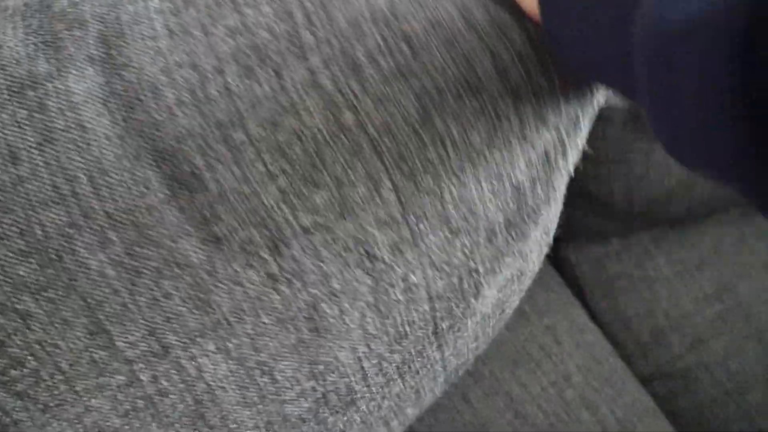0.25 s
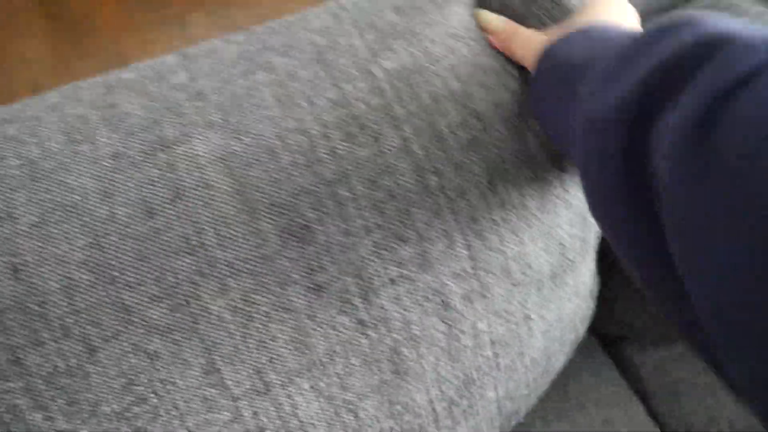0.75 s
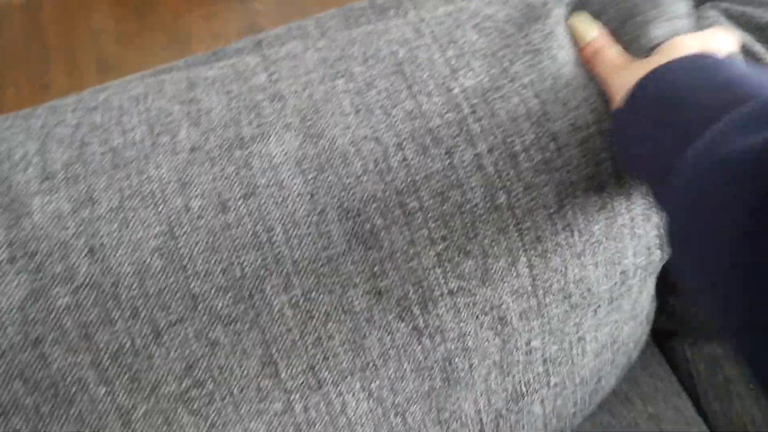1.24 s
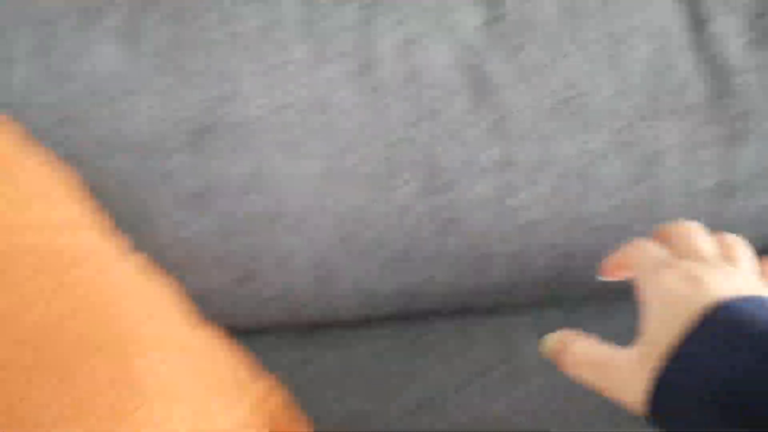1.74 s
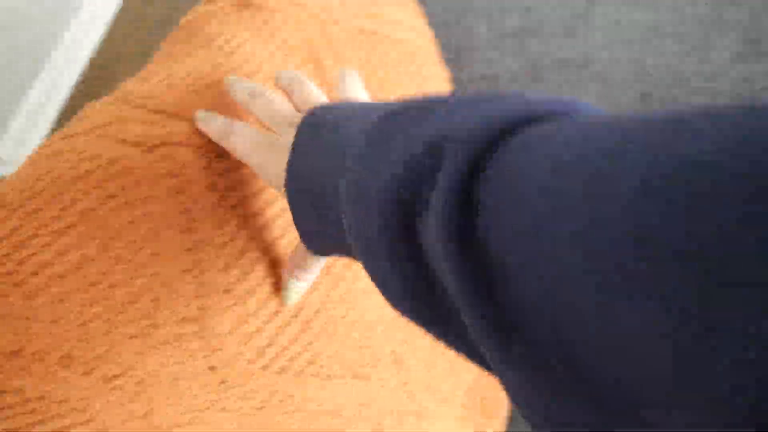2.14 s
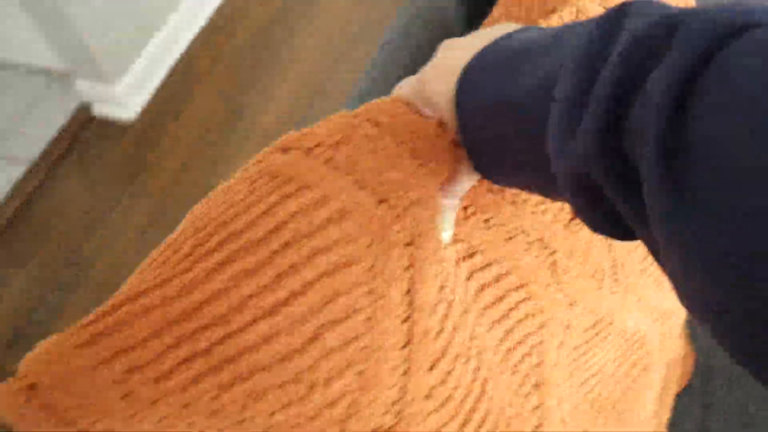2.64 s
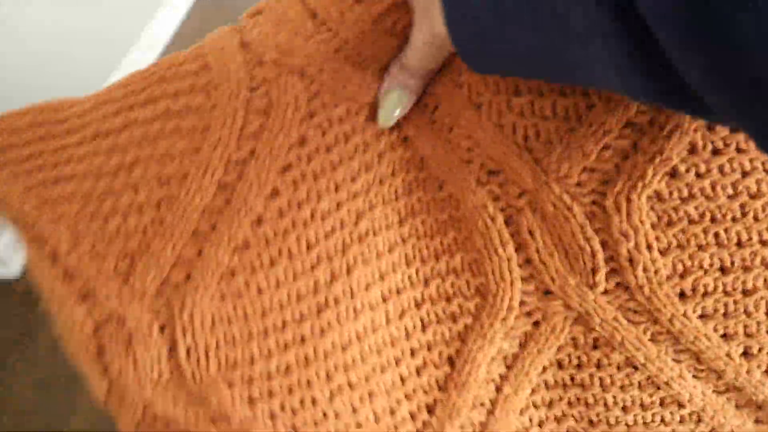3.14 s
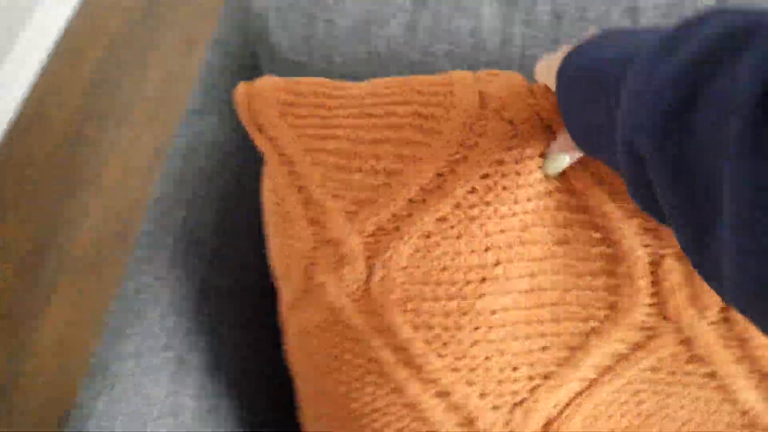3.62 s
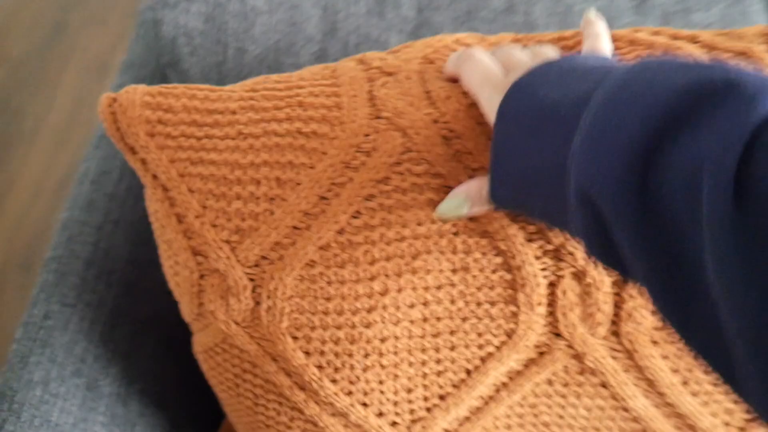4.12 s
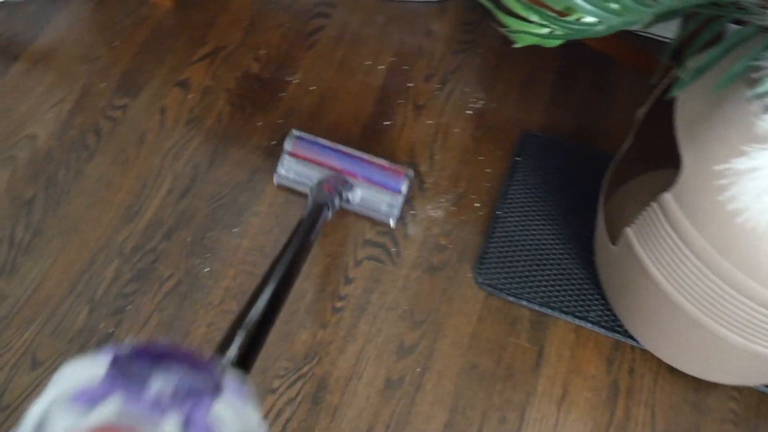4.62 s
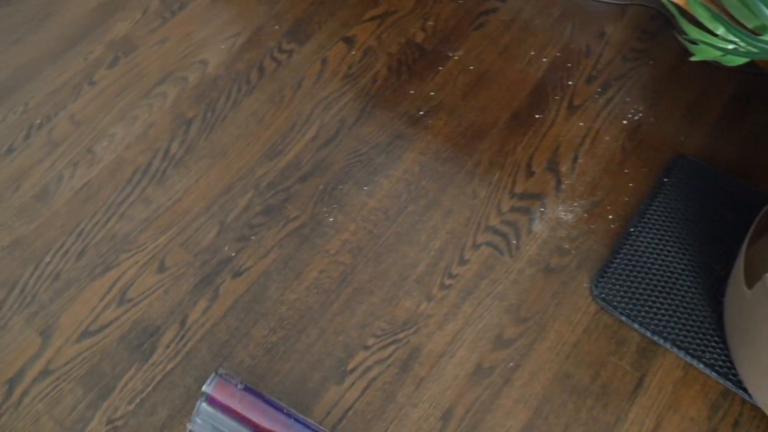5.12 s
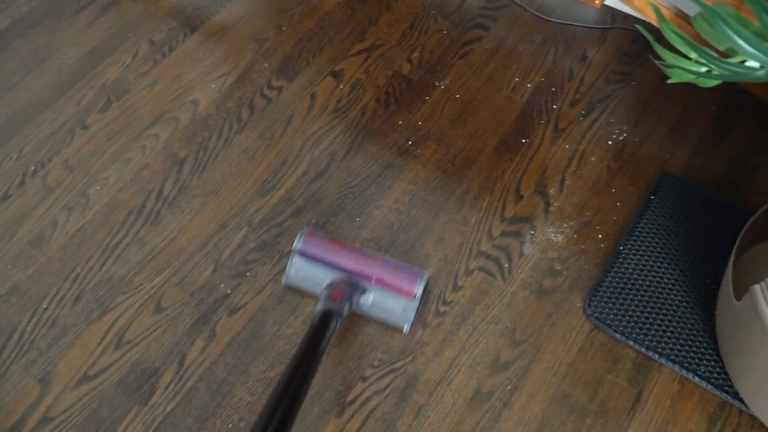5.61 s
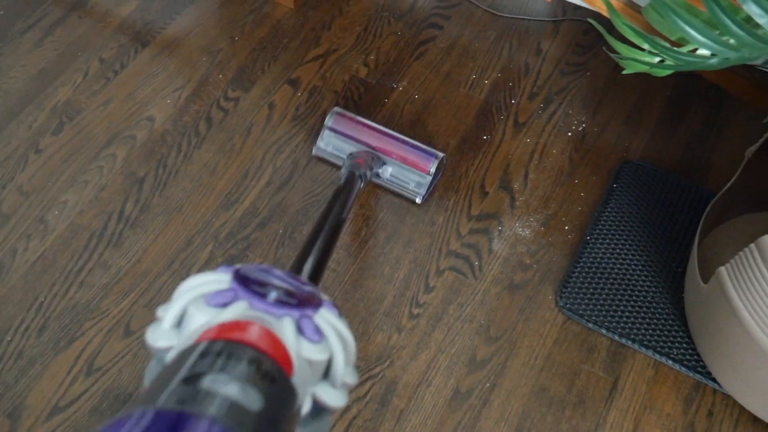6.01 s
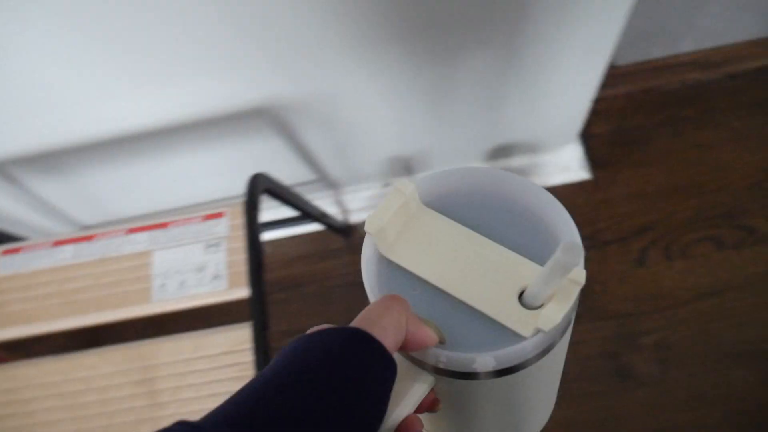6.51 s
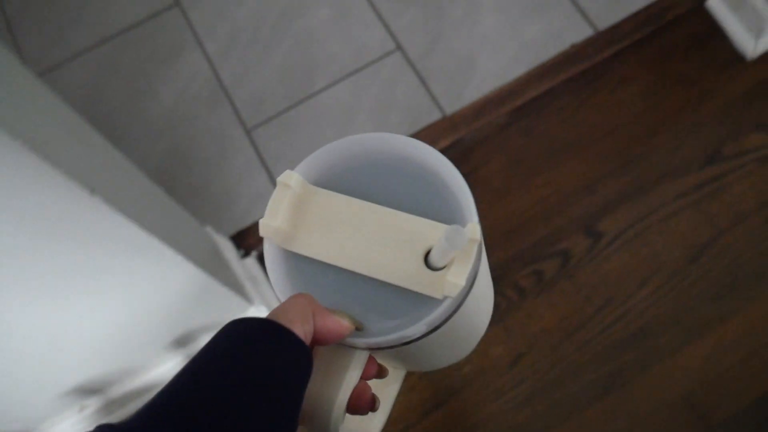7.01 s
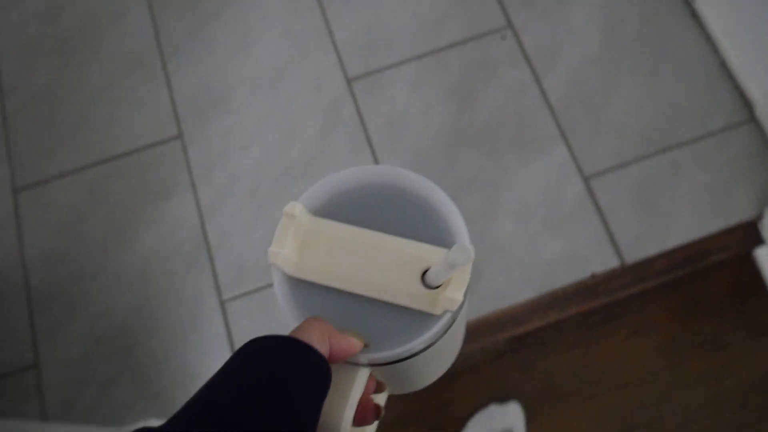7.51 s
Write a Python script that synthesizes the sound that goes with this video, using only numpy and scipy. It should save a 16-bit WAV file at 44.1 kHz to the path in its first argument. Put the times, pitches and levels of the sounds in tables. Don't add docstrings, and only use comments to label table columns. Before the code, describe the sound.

A handheld phone sits very close to sofa cushions in a quiet living room. From 0 s, fabric rubs and rustles; around 0.35 to 0.6 s a small metal pull jingles brightly amid a strong cloth stroke. At about 1.17 s a very hard, dull slap hits, followed by another at 1.3 s. Rustling eases, with a fainter jingle from 1.7 to 2 s. Firm pats land near 2.4 and 2.6 s, then small creaks and quiet rubbing, a soft thump at 3.65 s, and brushing scuffs to 4.5 s. At 4.55 s a cordless vacuum cuts in: high whine around 1.5 kHz with overtones, over rushing air, fluctuating as the wand swings. It stops abruptly at 6.54 s. Quiet slippered steps follow at roughly 6.8, 7.1 and 7.5 s, with scuffs, creaks and a low fridge hum.

```python
import sys
import numpy as np
from scipy import signal
from scipy.fft import rfft, irfft, next_fast_len
from scipy.io import wavfile
from scipy.ndimage import uniform_filter1d, map_coordinates

SR = 44100
rng = np.random.default_rng(int(sys.argv[2]) if len(sys.argv) > 2 else 0)


def inscribe(sig):
    pcm = np.round(np.clip(np.atleast_2d(sig).T, -1, 1) * 32767)
    wavfile.write(sys.argv[1], SR, pcm.astype(np.int16))


def magnitude_from_level(level_db):
    exponent = np.asarray(level_db, float) / 20
    return 10 ** exponent


N = 341775
T = np.arange(N) / SR
VACUUM_START_S, KITCHEN_START_S = 4.553, 6.536
TOP_HZ = 15850


def unit(x):
    return x / np.sqrt(np.mean(x ** 2))


def colour(x, points):
    hz, db = np.transpose(points)
    size = next_fast_len(len(x))
    f = np.maximum(np.arange(size // 2 + 1) * SR / size, 1)
    gain = magnitude_from_level(np.interp(np.log(f), np.log(hz), db))
    return irfft(rfft(x, size) * gain, size)[:len(x)]


def band(x, lo_hz, hi_hz):
    sos = signal.butter(2, [lo_hz, min(hi_hz, 20000)], "bandpass", fs=SR, output="sos")
    return signal.sosfilt(sos, x)


def mode(x, hz, t60):
    pole = np.exp(2j * np.pi * hz / SR - np.log(1000) / (t60 * SR))
    return signal.lfilter([1], [1, -pole], x).imag


def walk(rate):
    k = int(SR / rate)
    stairs = np.repeat(rng.standard_normal(N // k + 1), k)
    return 1.335 * uniform_filter1d(uniform_filter1d(stairs, k), k)[:N]


def add(out, s, sound):
    i = int(s * SR)
    out[i:i + len(sound)] += sound[:N - i]


def held(table):
    s, *columns = np.transpose(table)
    return [magnitude_from_level(np.interp(T, s, c)) for c in columns]


def gesture(s, swell, release):
    return 1000. ** np.minimum((T - s) / max(swell, .01), (s - T) / max(release, .01))


def house():
    # (frequency [Hz], level [dB per Hz])
    room_spectrum = [(35, -37), (60, 6.5), (130, -4.5), (172, -2.5), (767, -20), (862, -28), (946, -27.5),
                     (8710, -36.5), (16000, -37.5)]
    # (frequency [Hz], level [dB])
    fridge_tones = [(118.4, -44), (226.1, -63), (296.1, -56.5), (355.3, -68), (532.9, -76)]
    tone = magnitude_from_level(-55.5 + 0.65 * walk(3.6)) * unit(colour(rng.standard_normal(N), room_spectrum))
    fridge = sum(magnitude_from_level(db + hz / 150 * walk(3.615)) * np.sin(2 * np.pi * hz * T) for hz, db in fridge_tones)
    lounge = magnitude_from_level(-58.5 + 3.3 * walk(4.1)) * np.sin(2 * np.pi * 120.2 * T)
    return tone + np.sqrt(2) * np.where(T > KITCHEN_START_S, fridge, lounge)


def air():
    # (frequency [Hz], level [dB per Hz])
    air_spectrum = [(12, -43), (30, -40), (72, -14), (110, -19.5), (250, -9.5), (780, -7.5), (1400, -7.5),
                    (2400, -10.5), (2800, -13), (6400, -17), (9300, -18.5), (10500, -24), (14500, -26.5),
                    (15900, -31)]
    # (frequency [Hz], width [Hz], level [dB])
    duct_peaks = [(267, 30, 2.5), (399, 17, 3), (653, 30, 3), (1017, 18, 4), (1139, 14, 5), (1192, 18, 2.5),
                  (1287, 28, 3), (1346, 20, 3), (2024, 27, 3), (2330, 90, 2), (2417, 40, 3)]
    noise = colour(rng.standard_normal(N), air_spectrum)
    return noise + sum((magnitude_from_level(db) - 1) * band(noise, hz - w / 2, hz + w / 2) for hz, w, db in duct_peaks)


def patchy(x):
    patch_db, patches_per_octave, patches_per_s = 1.6, 5, 6
    hz, s, z = signal.stft(x, SR, nperseg=2048)
    octave = np.log2(1 + hz / 100)
    place = np.meshgrid(octave * patches_per_octave, s * patches_per_s, indexing="ij")
    field = map_coordinates(rng.standard_normal((50, 60)), place, order=1)
    field = field / (1 + hz[:, None] / 5000)
    return signal.istft(z * magnitude_from_level(patch_db * field), SR, nperseg=2048)[1][:N]


def motor_whine(shaft):
    orders = (1, 2, 4, 7, 3, 5)
    flutter_db = (1.2, 1.8, 2.5, 2.5, 1.8, 1.5)
    overtones_db = (-37.5, -40.5, -41, -46, -36.5, -54)
    # (time [s], change [dB])
    fade_tables = [
        [(4.634, -11), (5.294, -7.5), (6.06, -5.5)],
        [(4.82, 1.5), (4.91, -6), (5.07, 5), (5.17, 3), (5.4, -1), (5.55, -2.5), (5.7, 4), (5.8, 4), (6.0, -7),
         (6.27, -4), (6.47, 3.5)],
        [(4.66, 7), (4.9, 3), (5.134, 6.5), (5.294, 8.5), (5.6, -13), (5.924, 6.5), (6.166, 5), (6.42, -18),
         (6.51, 9)],
        [(4.57, -6.5), (4.634, 5.5), (4.73, 0), (4.94, 4), (5.924, 4.5), (6.13, -17), (6.284, 1), (6.5, 5.5)],
        [(4.66, 5), (4.9, 5), (5.15, -7), (5.32, 2), (5.5, -8), (5.64, -6), (5.88, 3), (6.03, 4), (6.2, -6),
         (6.28, 2), (6.47, 3)],
        [(5.1, 3), (5.24, 9), (5.32, 7), (5.55, 3), (5.95, -6), (6.35, 2)],
    ]
    fade_s = 0.057
    speed_hz = 1560 * (1 + 0.000888 * walk(14))
    phase = 2 * np.pi * np.cumsum(speed_hz) / SR
    second, third, fourth, fifth, blade, eighth = magnitude_from_level(np.array(overtones_db))
    gains = (shaft, second, fourth, blade, third, fifth)
    whine = eighth * magnitude_from_level(1.3 * walk(13)) * np.sin(8 * phase)
    for order, gain, rows, db in zip(orders, gains, fade_tables, flutter_db):
        fade = magnitude_from_level(sum(change * np.exp(-((T - s) / fade_s) ** 2) for s, change in rows))
        whine = whine + gain * fade * magnitude_from_level(db * walk(60)) * np.sin(order * phase)
    return whine


def vacuum():
    # (time [s], shaft tone [dB], brush head roar [dB], motor body nearness [dB])
    wand_swing = [(4.57, -23, -32, 0), (4.65, -22.5, -30, 0.5), (4.75, -21.5, -27.5, 0.5),
                  (5.0, -18, -28, 0), (5.22, -19.5, -27.5, 0.5), (5.45, -19.5, -27, -1),
                  (5.58, -24, -28.5, -1), (5.7, -33.5, -29.5, -1), (5.95, -29, -31, 0),
                  (6.15, -26.5, -32, 0), (6.35, -25, -31, -0.5), (6.52, -20.5, -27, 0)]
    shaft, head, body = held(wand_swing)
    whine = motor_whine(shaft)
    gust = patchy(air())
    roar, duct, exhaust = (unit(band(np.roll(gust, lo), lo, hi))
                           for lo, hi in ((15, 700), (700, 2600), (2600, 17000)))
    hiss = magnitude_from_level(-24) * exhaust * magnitude_from_level(.4 * walk(20))
    flow = head * roar + body * (magnitude_from_level(-26) * duct + hiss)
    start = np.clip((T - VACUUM_START_S) / .008, 0, 1)
    end = np.clip((KITCHEN_START_S - T) / .016, 0, 1)
    return start * end * (np.sqrt(2) * whine + flow)


def ticks():
    # (time [s], peak level [dB], ring frequency [Hz])
    tick_events = [(0.379, -39, 5150), (0.9642, -50, 2990), (0.9963, -37, 3700), (1.489, -43, 2550),
                   (1.5065, -42, 9030), (1.6185, -41, 4770), (1.6235, -40.5, 5100), (2.392, -36.5, 5500),
                   (2.407, -41, 6000), (2.448, -41.5, 6000), (2.4693, -47, 7940), (2.5202, -50, 4430),
                   (2.6523, -40, 1300), (2.2925, -35, 5950), (2.422, -46, 4000), (7.1432, -38, 3000),
                   (7.4201, -42, 3660), (1.2795, -45, 5500), (1.2845, -45, 6000), (2.8908, -49, 6100),
                   (3.6531, -47, 2990), (4.373, -46, 5310)]
    width_hz = 2800
    out, t = np.zeros(N), T[:SR // 30]
    for s, db, hz in tick_events:
        click = rng.standard_normal(len(t)) * np.exp(-t / 0.0026)
        tick = band(click, max(hz - width_hz / 2, 300), hz + width_hz)
        add(out, s, magnitude_from_level(db) * tick / np.abs(tick).max())
    return out


def jingle():
    # (time [s], level [dB], swell [s], release [s])
    shakes = [
        (0.34, -56, .05, .5),
        (0.381, -44, 0.02, 0.45),
        (0.452, -47, 0.11, 0.4),
        (0.519, -44, 0.22, 0.35),
        (0.6, -44, .25, .13),
        (1.466, -63, 0.31, .25),
        (1.702, -60, 0.15, .6),
        (1.79, -51, 0.13, 0.39),
        (1.911, -51, 0.048, .45),
        (2.04, -58, .2, .2),
    ]
    # (time [s], level [dB])
    firm_knocks = [(0.3348, -49), (0.3787, -31), (0.394, -35), (0.4231, -39), (0.4515, -38), (0.4874, -38),
                   (0.5059, -35), (0.5189, -31), (0.5757, -40), (0.592, -40), (1.7017, -51), (1.7791, -48),
                   (1.789, -48), (1.9108, -44), (1.9437, -49)]
    # (frequency [Hz], level [dB], 60 dB decay [s])
    pull_tones = [(5165, 0, .032), (5215, -2, .026), (5300, -6, .018), (5420, -7, .013), (5620, -5, .011),
                  (5820, -6, .009), (12215, -20, .025), (12300, -23, .02)]
    light = (rng.random(N) < 1400 / SR) * magnitude_from_level(2.0 * rng.exponential(size=N)) * rng.standard_normal(N)
    _, first_hz, first_t60 = 0, pull_tones[0][0], pull_tones[0][2]
    scale = np.sqrt(np.mean(mode(light, first_hz, first_t60) ** 2))
    shaking = sum(magnitude_from_level(db) * gesture(s, swell, release) for s, db, swell, release in shakes)
    knocks = light / scale * magnitude_from_level(3 * walk(60)) * shaking
    for s, db in firm_knocks:
        knocks[int(s * SR)] += magnitude_from_level(db - 1)
    free = T < 1.2
    out = np.zeros(N)
    for hz, db, t60 in pull_tones:
        ring = mode(knocks * free, hz, t60) + mode(knocks * ~free, hz * 1.012, .36 * t60)
        out += magnitude_from_level(db) * band(ring, .97 * hz, 1.03 * hz)
    return out


def scuffs():
    # (time [s], level [dB], centre [Hz], width [Hz], 60 dB decay [s])
    catches = [(0.116, -44, 2920, 4000, 0.5), (1.489, -45, 10500, 5000, .02),
               (1.864, -44.5, 1480, 1940, 0.31), (2.29, -44.5, 3040, 5330, 0.091),
               (2.69, -56, 5700, 1200, 0.3), (3.65, -54, 13500, 3000, .08), (4.0, -61, 13000, 3020, .1),
               (4.259, -40, 900, 1440, 0.35), (4.412, -43.5, 600, 765, 0.18), (1.192, -48, 2700, 2000, .15),
               (1.178, -50, 2500, 2500, .1), (4.373, -58, 5300, 1100, .35), (0.8, -47.5, 1600, 1200, 0.26),
               (2.855, -50, 1100, 600, .25), (3.6, -56, 1990, 400, .3), (6.776, -45, 497, 685, 0.29),
               (7.142, -48.5, 7000, 9000, 0.22), (7.415, -48.5, 4500, 8500, 0.38)]
    # (time [s], level [dB], centre [Hz], width [Hz], 60 dB decay [s])
    slow_strokes = [(0.0, -48, 2500, 3450, 0.37), (0.25, -40.5, 2210, 3400, 0.38),
                    (4.05, -48.5, 2800, 2630, 0.24), (3.37, -50.5, 2190, 300, .12),
                    (0.15, -38, 3800, 900, 0.13), (0.481, -34.5, 1480, 2180, 0.52),
                    (0.649, -45, 1440, 910, 0.81), (1.775, -46.5, 5740, 1200, 0.22),
                    (2.75, -53.5, 1200, 680, 0.83), (3.69, -55.5, 8500, 2500, 0.29),
                    (3.85, -48, 1450, 1200, 0.44), (4.291, -50, 9000, 9000, 0.13),
                    (6.9, -60, 6430, 600, 0.28), (7.2, -49, 2700, 500, 0.15), (7.28, -56, 1200, 250, 2.7)]
    # (time [s], level [dB], frequency [Hz], 60 dB decay [s])
    creak_events = [(0.452, -46, 3260, 0.44), (0.786, -54, 4100, 0.28), (1.3, -51, 1150, 0.42),
                    (2.692, -57, 2340, 0.34), (2.7032, -48, 2300, .04), (2.76, -60, 2350, .2),
                    (2.795, -60, 2360, 0.26), (2.814, -54, 2200, 0.045), (2.85, -60, 2350, 0.18),
                    (2.885, -58.5, 2380, 0.32), (2.578, -53, 2300, .06), (2.7, -58, 1200, 0.23),
                    (2.835, -55, 1500, .2), (2.765, -53, 650, .2), (2.89, -53, 620, .25),
                    (3.8, -53, 1100, .08), (3.559, -50, 2200, .05), (3.8962, -46.5, 1500, 0.093),
                    (3.88, -52, 2650, .12), (4.0219, -48, 2210, .06), (3.59, -57, 4750, .1),
                    (4.09, -55.5, 1270, 0.37), (1.36, -55, 1370, .5), (7.3842, -55, 2600, .05),
                    (3.286, -60, 2760, 0.36), (3.43, -60, 2720, .1), (3.43, -58.5, 6700, 0.12),
                    (3.55, -56, 2150, 0.2), (4.02, -59, 4670, 0.2), (6.96, -64, 3100, 0.33),
                    (7.145, -50.5, 2700, .12), (7.149, -56, 4000, 0.37), (7.474, -50, 2575, 0.07),
                    (7.527, -51.5, 3010, 0.22)]
    sudden_s, gradual_s, creak_width_hz = 0.0018, 0.013, 340
    out, t = np.zeros(N), T[:SR // 2]
    creaks = [(s, db, hz, creak_width_hz, t60) for s, db, hz, t60 in creak_events]
    for rise, table in ((sudden_s, catches + creaks), (gradual_s, slow_strokes)):
        for s, db, hz, width_hz, t60 in table:
            grit = magnitude_from_level(.6 * rng.exponential(size=len(t) // 128 + 1).repeat(128)[:len(t)])
            noise = rng.standard_normal(len(t)) * grit
            rub = unit(band(noise, max(hz - width_hz / 2, 150), hz + width_hz / 2))
            add(out, s, magnitude_from_level(db) * rub * (1 - np.exp(-t / rise)) * 1000. ** (-t / t60))
    return out


def pats():
    # (time [s], peak level [dB], body [Hz], 60 dB decay [s], sway re peak [dB])
    pushes = [(0.236, -22.5, 90, 0.05, -8), (0.516, -35.5, 143, 0.34, 1), (1.1632, -9.5, 219, 0.026, -20),
              (1.11, -38, 300, .3, -20), (1.174, -26, 112, .09, -30), (1.193, -17, 21, 0.21, -24),
              (1.3, -29, 150, 0.04, -20), (1.328, -19.5, 80, 0.053, -1), (2.41, -21.5, 66, 0.055, -5.5),
              (2.446, -15.5, 40.4, 0.026, -15), (2.602, -15, 68, 0.017, -8), (2.631, -19, 72.5, 0.077, -16),
              (2.914, -38, 87, 0.12, -11), (3.058, -40, 151, 0.075, 8.5), (3.255, -42, 171, 0.04, 6),
              (3.48, -35, 122, 0.078, -5), (3.648, -19, 70.6, 0.18, -3.5), (3.68, -14.5, 40, 0.044, -30),
              (4.009, -29.5, 102, 0.073, 2), (4.157, -27, 40, 0.031, -2.5), (4.601, -19, 40.4, 0.013, -21),
              (7.092, -29, 40.4, 0.039, -11), (7.09, -44, 170, .09, -20), (6.79, -42, 170, .14, -20),
              (6.85, -42, 60, .15, -20), (7.35, -40, 60, .15, -20), (7.495, -40, 215, .08, -20),
              (0.53, -34, 140, .08, -20), (0.79, -40, 200, .12, -22), (2.09, -47, 240, 0.16, -20),
              (2.58, -40, 260, .08, -20), (4.37, -47, 200, .15, -20), (7.497, -28, 41, 0.071, -10)]
    # (time [s], peak level [dB], decay [s], ring level [dB], contact time [s])
    palm_slaps = [
        (1.1657, -2, 0.0026, -31, 0.00008),
        (1.2944, -9.5, 0.0034, -62, 0.00011),
        (2.413, -14, 0.0036, -66, 0.00017),
        (2.6062, -22.5, 0.0031, -57, 0.00017),
        (2.619, -28, 0.003, -70, 0.00014),
        (3.654, -21.5, 0.0039, -65, 0.00067),
        (0.229, -31, 0.0043, -72, 0.00026),
        (7.497, -31, 0.0042, -70, 0.00054),
    ]
    # (frequency [Hz], level [dB], 60 dB decay [s])
    small_parts = [(8570, -11.5, 0.06), (10050, -19, 0.051), (7900, -3.5, 0.014), (4883, -19, .06),
                   (13300, -9, .03)]
    limit = .7
    out, t = np.zeros(N), T[:SR // 4]
    for s, db, hz, t60, sway_db in pushes:
        body = np.sin(2 * np.pi * hz * t) * (1 - np.exp(-t / 0.0023)) * 1000. ** (-t / max(t60, .01))
        sway = np.sin(2 * np.pi * 16 * t) * np.exp(-((t - .06) / 0.063) ** 2)
        add(out, s - .002, magnitude_from_level(db) * (body / body.max() + magnitude_from_level(sway_db) * sway))
    swing = np.cos(2 * np.pi * 156 * t - .6)
    twang = .6 * np.sin(2 * np.pi * 1850 * t) * np.exp(-t / 0.00028)
    ring = np.zeros(len(t))
    for hz, db, t60 in small_parts:
        pair = np.sin(2 * np.pi * hz * t) + .6 * np.sin(2 * np.pi * hz * 1.022 * t)
        ring += magnitude_from_level(db) * pair * 1000. ** (-t / t60)
    for s, db, decay, ring_db, contact in palm_slaps:
        step = (1 - np.exp(-(t / contact) ** 2)) * np.exp(-(t / decay) ** 2) * (swing + twang)
        add(out, s, magnitude_from_level(db) * step + magnitude_from_level(ring_db) * ring)
    return limit * np.tanh(out / limit)


def cloth():
    # (time [s], cloth motion [dB], phone rocking [dB])
    busy = [(0.0, 8, -25), (0.3, 17, -23.5), (0.44, 4.5, -30), (0.67, 5.5, -28.5), (1.2, 9, -26.5),
            (1.62, 4, -26), (1.99, -1.5, -32), (2.36, 2, -26), (2.7, 2.5, -27), (3.1, -6, -37),
            (3.7, 6, -28.5), (4.1, 5, -30), (4.5, -1.5, -31.5), (6.6, 1.5, -41), (7.1, -1.5, -30.5),
            (7.38, 2, -37), (7.47, 12, -24), (7.75, 7, -59)]
    # (time [s], level [dB], brightness [dB], swell [s], release [s])
    squeezes = [(0.0, -50, 2, .1, 0.76), (0.224, -52, 1, .3, 0.3), (0.278, -45, -10, 0.32, 0.29),
                (0.49, -38, 10, 0.21, 0.85), (1.01, -46.5, -7, 0.29, 0.12), (1.152, -43.5, -22, 0.25, 0.18),
                (1.283, -40, 1, 0.1, 0.093), (1.52, -52.5, 0, 0.84, 0.22), (2.299, -43.5, 4.5, 0.016, 0.41),
                (2.425, -36, -7, 0.25, 0.07), (2.48, -54, -23, 0.053, 0.56), (2.61, -46.5, 6, 0.18, 0.17),
                (2.9, -52.5, 1, 0.89, 0.2), (3.0, -69, -12, 0.16, 0.8), (3.28, -63, -21, 1.05, 0.65),
                (3.66, -57, 5, 2.2, 0.59), (3.9, -46.5, 5.5, .4, 0.4), (4.26, -40.5, 3, 0.02, 0.34),
                (4.54, -48, -9, 0.92, 0.14), (6.55, -54.5, 10, 0.13, 0.38), (6.8, -53, -5, 0.035, .35),
                (7.134, -51.5, -0.5, 2.1, 0.16), (7.25, -60, 15.5, .3, 1), (7.748, -52.5, 11, 0.18, 0.43)]
    # (frequency [Hz], level [dB per Hz])
    weave = [(20, 11.5), (44, -11.5), (118, -9), (360, -27.5), (1000, -37.5), (2000, -44), (4000, -48.5),
             (6500, -43), (9200, -41.5), (10200, -46.5), (14500, -44.5), (16000, -68)]
    # (frequency [Hz], width [Hz], level [dB])
    folds = [(600, 170, -27), (1335, 430, -17), (2316, 1700, -25), (3510, 890, -25), (6560, 2300, -15.5),
             (8500, 2000, -14.5)]
    layers_hz = [(25, 250), (250, 1000), (1000, 4500), (4500, 16000)]
    rest_db = (-55, -62.5, -66, -73.5)
    follow = (0.57, 0.25, 1.0, 0.26)
    squeeze_share_db = (5, -2, -18, -35)
    squeeze_tilt = (-0.62, 0.22, 1, 0.36)
    motion, rocking = held(busy)
    out = magnitude_from_level(-7.0) * rocking * unit(band(rng.standard_normal(N), 9.0, 18.5))
    grains_db = 1.1 * rng.exponential(size=N // 32 + 1).repeat(32)[:N]
    slips = magnitude_from_level(grains_db + 1.5 * walk(30))
    shapes = np.array([gesture(s, swell, release) for s, _, _, swell, release in squeezes])
    _, squeeze_db, bright_db = np.transpose(squeezes)[:3]
    for k, (lo, hi) in enumerate(layers_hz):
        moving = magnitude_from_level(rest_db[k]) * motion ** follow[k]
        squeezed = magnitude_from_level(squeeze_db + squeeze_share_db[k] + squeeze_tilt[k] * bright_db) @ shapes
        noise = unit(band(colour(rng.standard_normal(N) * slips, weave), lo, hi))
        for hz, width_hz, db in folds:
            if lo < hz < hi:
                pocket = unit(band(noise, hz - width_hz / 2, hz + width_hz / 2))
                noise = noise + magnitude_from_level(db + 6 * np.clip(walk(12), -2, 1.2)) * pocket
        out = out + (moving + squeezed) * noise * magnitude_from_level(1.5 * walk(20))
    return out


def scene():
    mid = house() + vacuum() + ticks() + jingle() + scuffs() + pats() + cloth()
    return np.array([mid, mid])


def thin_treble(mid):
    # (frequency [Hz], level re sound [dB])
    side_spectrum = [(30, -32), (200, -18.5), (500, -13), (2400, -15), (5000, -8.5), (15000, -10)]
    split_share, hole_share, dither_db = 0.47, .16, -72.5
    hz, _, z = signal.stft(mid, SR, "cosine", 2048)
    tile = np.floor(9 * np.log(1 + hz / 700)).astype(int)
    chance = rng.random((3, tile.max() + 1, z.shape[1]))
    fine = rng.random((len(hz) // 8 + 1, z.shape[1])).repeat(8, axis=0)[:len(hz)]
    kept = fine > hole_share * (hz[:, None] / 14000) ** 3
    kept &= hz[:, None] < TOP_HZ - 700 * chance[0, 0]
    split = (chance[1, 0] < split_share) & (chance[2, tile] < chance[1, 1] + .15) & (fine < .8)
    side_noise = np.abs(z) * split * kept * np.exp(2j * np.pi * rng.random(z.shape))
    mid, side = (signal.istft(v, SR, "cosine", 2048)[1][:N] for v in (z * kept, side_noise))
    dither = magnitude_from_level(dither_db) * band(rng.standard_normal(N), 1900, 16000)
    side = colour(side, side_spectrum) + dither
    return np.array([mid + side, mid - side])


def top_cut(x):
    return signal.sosfilt(signal.butter(12, 16450, fs=SR, output="sos"), x)


def record(dry):
    low_pass = signal.ellip(8, .2, 70, TOP_HZ, fs=SR, output="sos")
    wet = signal.sosfilt(low_pass, thin_treble(dry[0]))
    return top_cut(wet)


dry = scene()
out = record(dry)
inscribe(out)
```